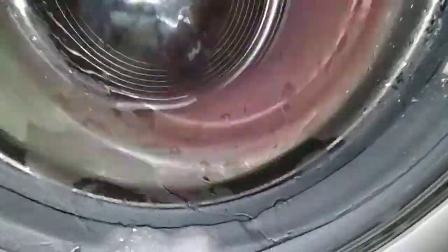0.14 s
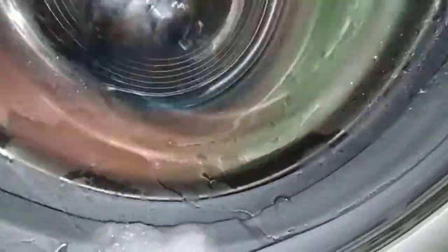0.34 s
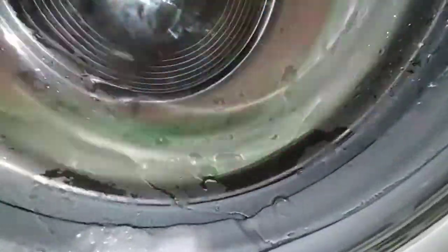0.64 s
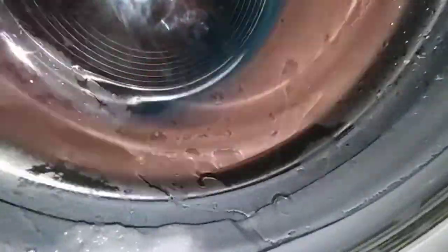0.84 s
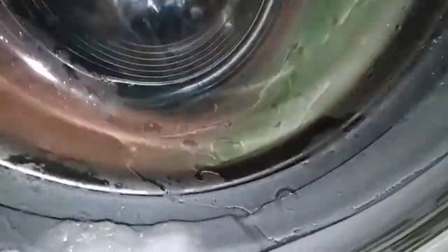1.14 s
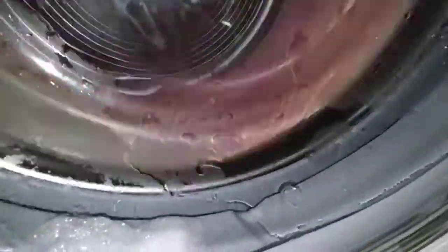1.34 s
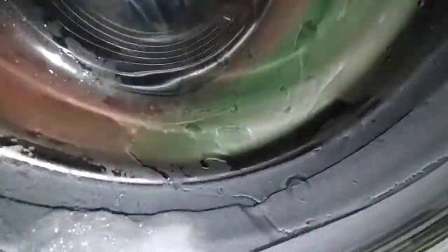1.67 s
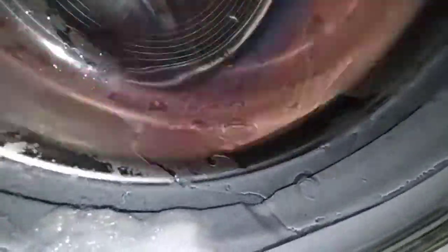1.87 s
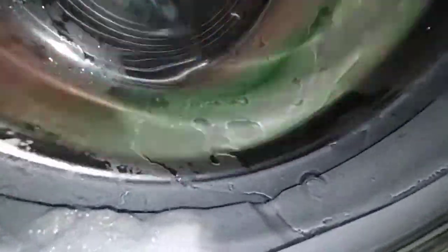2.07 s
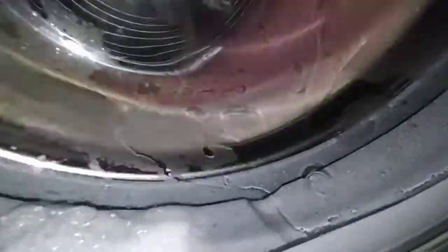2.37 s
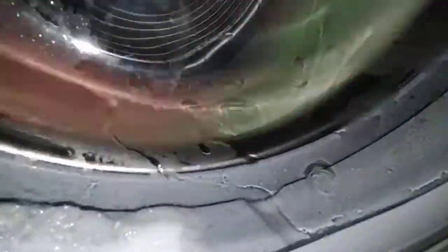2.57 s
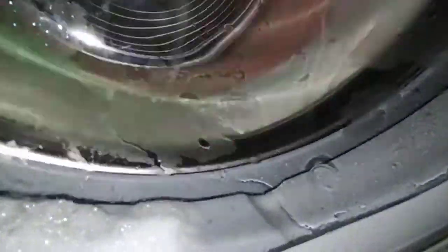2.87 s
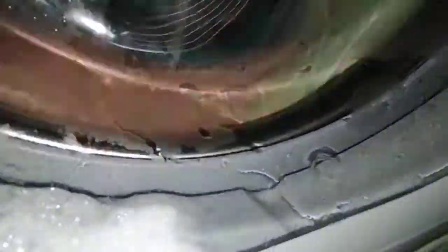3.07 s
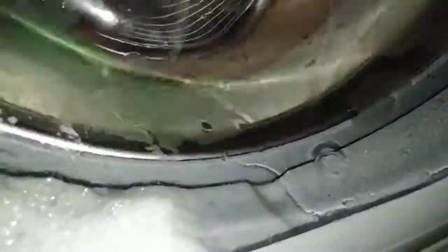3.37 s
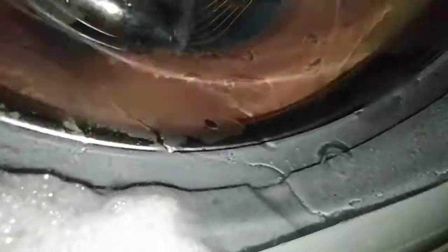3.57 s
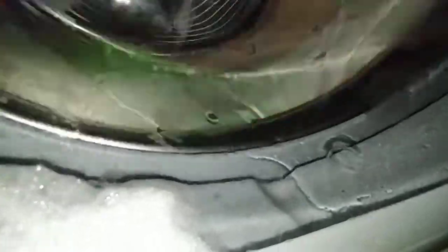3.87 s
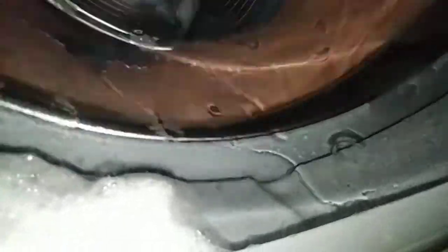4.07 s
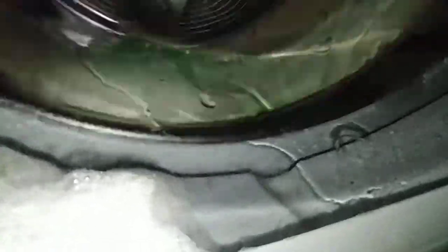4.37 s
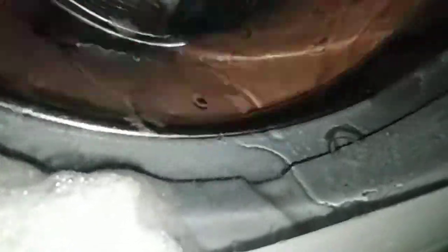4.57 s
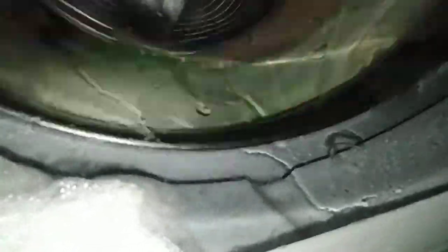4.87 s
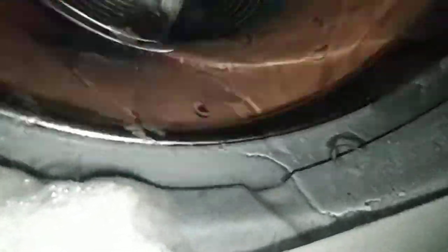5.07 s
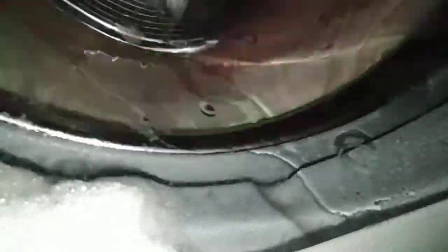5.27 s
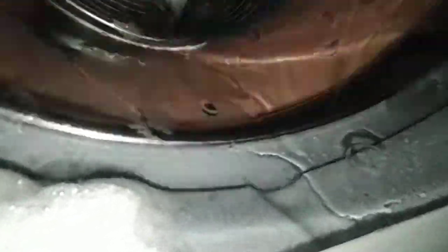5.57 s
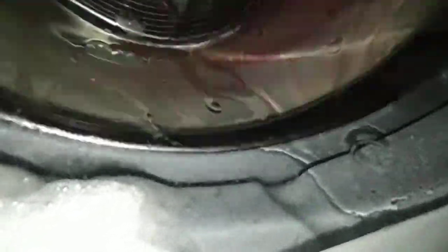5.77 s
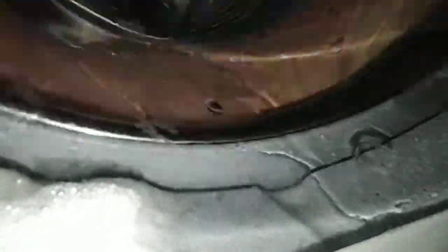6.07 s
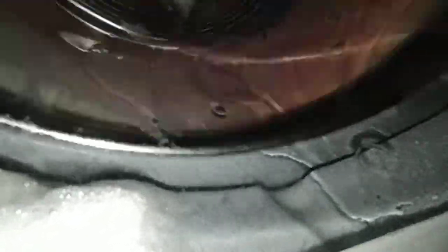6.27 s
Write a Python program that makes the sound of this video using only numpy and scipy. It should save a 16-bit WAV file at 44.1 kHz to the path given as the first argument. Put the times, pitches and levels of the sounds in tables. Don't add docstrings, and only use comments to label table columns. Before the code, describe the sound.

A washing machine gathers spin speed: a strong low motor hum slowly climbs in pitch over soft rumble, rushing air and hissing water.

```python
import sys
import numpy as np
from scipy import signal
from scipy.fft import rfft, irfft, next_fast_len
from scipy.io import wavfile

SR = 44100
rng = np.random.default_rng(int(sys.argv[2]) if len(sys.argv) > 2 else 0)


def generate_wav(sig):
    pcm = np.round(np.clip(np.atleast_2d(sig).T, -1, 1) * 32767).astype(np.int16)
    wavfile.write(sys.argv[1], SR, pcm)


def voltage_ratio(level):
    return 10 ** (np.asarray(level, float) / 20)


N = 283122
DROPOUT_S, LOST_SAMPLES = 3.56104, 1024
RUN = N + LOST_SAMPLES

# pitch_hz, level_db, left_over_right_db, left_lead_rad
CABINET = [(268.4, -29, 1.5, -0.089), (268.9, -27.5, 1.5, 0), (271.4, -20, 0, 0.092), (275, -20.5, 0, 0.17),
           (280.3, -24, -2.5, 0.22), (282.1, -28, -1.5, 0.38), (287.2, -22, 1, 0.11),
           (286.5, -23.5, 0, 0.3), (291, -28, -2.5, 0.33), (291, -27, 0, -0.38), (292.1, -30.5, 3, 0.17)]
# pitch_hz, angle_turns
HUM_ANGLE = [(267.7, .02), (270, .11), (276, .11), (280.5, .13), (282.3, .17), (284, .25), (285.8, .23),
             (289, .14), (293, .07), (295.5, .07)]
# hum_hz, lower_db, lower_turns, upper_db, upper_turns
WOBBLE = [(268, -47, .1, -41, .44), (270.3, -45, .15, -40, .57), (272, -42.5, .21, -40.5, .61),
          (275.4, -41, .3, -40, .71), (279, -35, .31, -39, .72), (281.5, -36, .25, -40.5, .74),
          (285.8, -39, .23, -46, .81), (289, -40.5, .22, -48, .88), (291.5, -40, .22, -47, .92),
          (294.5, -41, .13, -46, .8)]
# hum_hz, left_db, left_turns, right_db, right_turns
OCTAVE = [(268.8, -58, .85, -61, .92), (273, -57, .93, -55, .95), (277.3, -61, 1, -55, .94),
          (279.5, -72, 1.1, -63, 1.2), (281.6, -70, 1.26, -61, 1.38), (283.8, -64, 1.4, -51, 1.35),
          (286, -60, 1.33, -48.5, 1.28), (288.1, -54, 1.36, -51, 1.28), (290.2, -56, 1.21, -51, 1.23),
          (293, -58, 1.05, -52, 1.2)]

TUB_ORDERS = [(7, 0, .7), (11, .28, 1), (18, 0, .5), (24, .5, .7), (29, 0, 1), (28, .06, 1), (27, .68, 1),
              (34, .2, 0), (38, .9, .55), (39, .88, 0), (40, .5, 0), (8, 0, 0), (10, .99, .2),
              (13, .45, .4), (20, .8, .3), (23, .65, .9), (25, .15, .3)]
# pitch_hz, width_hz, level_db
TUB_MODES = [(54.54, 4.1, -37.5), (86.36, 2.7, -41.5), (147, 8.2, -47), (181.4, 6, -46),
             (221.6, 4.9, -49.5), (223, 4.7, -53), (220.6, 2.2, -45.5), (270, 35, -50), (300, 11, -45.5),
             (303, 8.1, -42.5), (307, 15, -51), (65, 6, -55), (81.2, 2.8, -55.5), (105.1, 5, -53),
             (166.2, 4.2, -49), (184.3, 7, -49), (192, 17, -51)]
WEAK_ORDERS = [3, 5, 9, 16, 21]
WEAK_ORDER_DB = [-57, -62.5, -54, -50.5, -56]

PUMP_MULTIPLES = [2, 3, 4, 6, 7, 8, 9, 10, 11]
PUMP_ANGLE = [.29, .29, .08, .29, .29, .03, .05, .94, .29]
PUMP_DB = [-63.5, -63.5, -52, -39, -63.5, -56.5, -53, -59.5, -62]

# start_s, length_s, level_db, pitch_hz
BOOMS = [(0.147, 0.083, -41, 137), (1.134, 0.039, -39.5, 149), (1.234, 0.15, -37, 131.3),
         (1.607, 0.037, -40.5, 148), (1.809, 0.033, -41, 132.6), (1.907, 0.034, -40, 140),
         (2.144, 0.164, -39, 132), (2.434, 0.051, -33, 136), (2.577, 0.13, -38, 138.6),
         (2.803, 0.14, -38, 138.5), (3.066, 0.058, -38, 132.6), (3.198, 0.17, -38, 139.4),
         (3.507, 0.138, -41, 131), (3.992, 0.028, -34.5, 140), (4.082, 0.035, -41, 130),
         (4.273, 0.12, -38.5, 136), (4.463, 0.23, -39.5, 142.8), (4.972, 0.048, -37, 136),
         (5.064, 0.051, -41, 134), (5.211, 0.064, -36.5, 137), (5.509, 0.04, -35, 138),
         (5.786, 0.066, -36, 133.8), (5.896, 0.068, -38, 146), (6.053, 0.109, -45, 147),
         (6.223, 0.035, -38.5, 143.4)]
# start_s, peak_db, centre_hz
SPURTS = [
    (0.6692, -38, 8370),
    (2.395, -38.5, 8820),
    (2.6537, -33, 8300),
    (4.0794, -43, 8030),
    (4.7794, -42, 3830),
]
# start_s, peak_db, left_over_right_db
TICKS = [(0.4624, -43.5, 13), (0.4877, -41, 11), (0.7534, -39, 2), (1.066, -50, 11), (1.424, -50, 12),
         (1.5394, -53, 9), (1.738, -43, -2), (1.947, -42, 6), (2.0554, -48, 5), (2.415, -44, 12),
         (2.995, -43, 10), (3.2929, -44, -7)]

# pitch_hz, density_db_per_hz
SPRAY = [(4500, -20), (5500, -6), (7000, -2.5), (8200, 1.5), (9200, 2), (10500, 1), (12500, -4),
         (14000, -5)]
BEFORE_SOAK_DB = (-16, -0.5)

CARRIER_HZ = (14781, 14767)
SIDEBANDS = [-7, -5, -1, 1, 5, 7]
# left_db, right_db
WHISTLE = [(-84.5, -89), (-99.5, -100.5), (-74.5, -78.5), (-88, -79), (-96.5, -91.5), (-94, -95)]
# pitch_hz, width_hz, level_db
CARRIER_HISS = [(14770, 380, -65), (14250, 600, -72.5), (15300, 600, -72)]

# pitch_hz, width_hz, level_db
PANELS = [(136, 29, -51.5), (182.8, 16, -53), (401.2, 11, -52), (449, 16, -55.5), (551.7, 24, -56.5),
          (835, 52, -56.5), (849.6, 27, -58)]
# pitch_hz, width_hz, level_db
WHIRR = [(1043, 38, -57), (1246, 156, -50.5)]
# pitch_hz, width_hz, level_db
HOLES = [(2434, 130, -62.5), (2772, 120, -61.5)]

# pitch_hz, density_db_per_hz
RUMBLE = [(24, -18), (45, -21.5), (75, -18.5), (140, -11), (190, -12.5), (230, -8), (480, -18.5),
          (600, -17)]
# pitch_hz, density_db_per_hz
ROAR = [(600, -9), (700, -7.5), (850, -2.5), (1050, -3.5), (1300, -9), (1700, -8.5)]
# pitch_hz, density_db_per_hz
AIR = [(1300, -8), (1700, -1.5), (2000, -0.5), (2450, 0), (3100, -5.5), (4000, -10), (5000, -17),
       (6500, -16)]
# before_mic_turn_db, after_mic_turn_db
RUMBLE_DB = (-40, -40)
ROAR_DB = (-47.5, -45.5)
AIR_DB = (-51.5, -52.5)
SPRAY_DB = (-59.5, -57)

# pitch_hz, width_hz, level_db
ROOM = [(31, 6, -8), (92, 5.4, -4), (118, 9, -3.5), (161.4, 7.6, 5), (172, 6, -6), (195, 9, 5.5),
        (204, 4.8, -10), (228, 13, -8), (335, 13, -4.5), (412, 18, -3.5), (471, 19, -4.5), (511, 19, 5.5),
        (529, 14, -4), (564.5, 9.7, -0.5), (650, 26, -3.5), (678, 15, 2.5), (780, 20, 3.5), (787, 16, -5.5),
        (890, 14, 2), (950, 20, 1.5), (970, 16, -1), (1020, 14, 3), (1064, 20, -3), (1080, 27, -0.5),
        (1190, 16, -0.5), (1310, 20, 1), (1390, 24, -4), (1390, 16, 5.5)]
# pitch_hz, likeness_share, right_lag_ms
LIKENESS = [(60, 0.98, 0), (292, 0.95, 0.23), (460, 0.69, 0), (697, 0.31, 0.067), (1110, 0.72, 0.23),
            (1380, 0.45, 0.35), (2220, 0.29, 0.064), (4000, .023, 0.33)]
# pitch_hz, before_mic_turn_db, after_mic_turn_db
LEANING = [(300, -1.5, -1), (597, 0, 0), (1200, 1, 0), (2600, 6, 1.5), (4240, 4.5, 4), (5470, 9.5, 0.5),
           (7000, 16.5, 5), (8500, -4, 1.5), (10200, -9, -2), (12400, -1.5, -1), (14700, 3, 6.5)]
# pitch_hz, width_hz, lost_before_turn_share, lost_after_turn_share
PORT_DIPS = [(703, 160, 0.42, 0.092), (1980, 450, 0.28, 0.046), (4800, 390, 0.27, 0.15),
             (5450, 750, .05, .35), (8300, 700, .3, .02), (10440, 1700, .02, 0.44)]
# pitch_hz, width_hz, lost_before_turn_share, lost_after_turn_share, port_0_left_1_right
ONE_PORT_DIPS = [(9900, 1100, .6, .15, 0), (11300, 800, .5, .3, 1), (6100, 600, .4, .2, 1)]
JOIN_STEP = [-.047, -.087]


def motor(drum, rate):
    hum_db, cabinet_mean_db = -25, -25
    hz = 36 * rate
    body_db, lean_db, lead = (at_hz(CABINET, hz, column=c) for c in (1, 2, 3))
    lower_db, lower, upper_db, upper = (at_hz(WOBBLE, hz, column=c) for c in (1, 2, 3, 4))
    angle = 36 * drum + at_hz(HUM_ANGLE, hz)
    level_db = hum_db + body_db - cabinet_mean_db
    hum = np.array([tone(angle + side * lead / (2 * np.pi), level_db + side * lean_db)
                    for side in (.5, -.5)])
    octave = np.array([tone(72 * drum + at_hz(OCTAVE, hz, column=c + 1), at_hz(OCTAVE, hz, column=c))
                       for c in (1, 3)])
    neighbours = tone(35 * drum + lower, lower_db) + tone(37 * drum + upper, upper_db)
    return hum + octave + neighbours


def drum_orders(drum, rate):
    lean_db, right_lead_samples = 1, 8
    orders = []
    for (k, angle, swing), (hz, width_hz, peak_db) in zip(TUB_ORDERS, TUB_MODES):
        off = 2 * (k * rate - hz) / width_hz
        slipped = angle - swing * np.arctan(off) / np.pi
        orders.append((k, slipped, peak_db - 10 * np.log10(1 + off ** 2)))
    orders += zip(WEAK_ORDERS, rng.random(len(WEAK_ORDER_DB)), WEAK_ORDER_DB)
    tub = sum(tone(k * drum + angle, db + 0.53 * drift(2.3)) for k, angle, db in orders)
    return np.array([voltage_ratio(lean_db / 2) * tub, voltage_ratio(-lean_db / 2) * np.roll(tub, -right_lead_samples)])


def pump():
    mains = turns(50.07)
    partials = zip(PUMP_MULTIPLES, PUMP_ANGLE, PUMP_DB)
    return sum(tone(k * mains + angle, db + 0.35 * drift(1.5)) for k, angle, db in partials)


def booms():
    out = np.zeros(RUN + SR)
    for (start_s, length_s, db, hz), angle in zip(BOOMS, rng.random(len(BOOMS))):
        s = np.arange(round(1.52 * length_s * SR)) / SR
        i = max(round((start_s - .3 * length_s) * SR), 0) + (start_s > DROPOUT_S) * LOST_SAMPLES
        note = np.sin(2 * np.pi * (hz * s + angle))
        out[i:i + len(s)] += voltage_ratio(db + 1.5) * np.hanning(len(s)) * note
    return out[:RUN]


def water():
    spurt_t60_s, spurt_rise_s, spurt_spread = 0.28, 0.0062, 0.23
    tick_hz, tick_t60_s = 2400, .012
    crack_hz, crack_db = 6500, -9
    out, s = np.zeros((2, RUN)), np.arange(SR // 5) / SR
    for start_s, db, hz in SPURTS:
        puff = rms_one(resonate(rng.standard_normal((2, len(s))), hz, hz * spurt_spread))
        swell = (1 - np.exp(-s / spurt_rise_s)) * voltage_ratio(-60 * s / spurt_t60_s)
        i = round(start_s * SR) + (start_s > DROPOUT_S) * LOST_SAMPLES
        out[:, i:i + len(s)] += voltage_ratio(db - 15.0) * puff * swell
    for start_s, db, lean_db in TICKS:
        burst = rng.standard_normal(len(s))
        body = rms_one(resonate(burst, tick_hz, tick_hz))
        crack = voltage_ratio(crack_db) * rms_one(resonate(burst, crack_hz, crack_hz))
        tick = (body + crack) * voltage_ratio(-60 * s / tick_t60_s)
        sides_db = np.array([[lean_db / 2], [-lean_db / 2]])
        i = round(start_s * SR)
        out[:, i:i + len(s)] += voltage_ratio(db - 2.0 + sides_db) * tick
    return out


def spray(turn):
    edge_hz, above_db, end_hz = 9700, -11, 13350
    soak_s, soak_rise_s = .465, .012
    hiss = banded_noise(SPRAY, turn, patchy_db=1.3, flicker=15.0)
    below = signal.sosfilt(signal.butter(10, edge_hz, fs=SR, output="sos"), hiss)
    above = signal.sosfilt(signal.butter(10, end_hz, fs=SR, output="sos"), np.roll(hiss, SR, axis=1))
    unsoaked = np.clip((soak_s - np.arange(RUN) / SR) / soak_rise_s, 0, 1)
    return voltage_ratio(np.outer(BEFORE_SOAK_DB, unsoaked)) * below + voltage_ratio(above_db) * above


def inverter(drum, turn):
    field = 12 * drum
    carrier = turns(np.linspace(*CARRIER_HZ, RUN) + 3.0 * drift(8))
    lines = 0
    for k, sides_db in zip(SIDEBANDS, WHISTLE):
        lines = lines + np.array([tone(carrier + k * field, db + 3.0 * drift(0.92)) for db in sides_db])
    steep = signal.ellip(8, .5, 40, 14060, "high", fs=SR, output="sos")
    smear = signal.sosfilt(steep, ringing_noise(CARRIER_HISS, turn))
    swell_db = np.interp(np.arange(RUN) / SR, [0, 3.2, 6.4], [-3, 1.5, 0])
    return (lines + smear) * voltage_ratio(swell_db)


def ringing_noise(modes, turn):
    white = rng.standard_normal((2, RUN))
    out = 0
    for hz, width_hz, db in modes:
        ring = spread(*resonate(white, hz, width_hz), hz, turn)
        out = out + voltage_ratio(db) * rms_one(ring)
    return out


def banded_noise(spectrum, turn, patchy_db, flicker):
    lowest, highest = spectrum[0][0], spectrum[-1][0]
    edges = lowest * 2 ** np.arange(0, np.log2(highest / lowest), 1 / 4)
    out, together, white = 0, drift(4.7), rng.standard_normal((2, 2, RUN))
    for k, (low, high) in enumerate(zip(edges, edges[1:])):
        band = signal.butter(2, [low, high], "band", fs=SR, output="sos")
        pair = signal.sosfilt(band, white[k % 2])
        hz = np.sqrt(low * high)
        level_db = at_hz(spectrum, hz) + patchy_db * (0.28 * together + drift(flicker))
        out = out + slow_gain(level_db) * spread(*pair, hz, turn)
    return rms_one(out)


def room(x):
    size = next_fast_len(RUN)
    hz = np.arange(size // 2 + 1) * SR / size
    response_db = sum(db / (1 + (2 * (hz - at) / width_hz) ** 2) for at, width_hz, db in ROOM)
    return irfft(rfft(x, size) * voltage_ratio(response_db), size)[:, :RUN]


def microphone_turn():
    from_s, to_s = 1.5, 4.7
    share = np.clip((np.arange(RUN) / SR - from_s) / (to_s - from_s), 0, 1)
    return share ** 2 * (3 - 2 * share)


def spread(near, other, hz, turn):
    alike = np.clip(at_hz(LIKENESS, hz), 0, 1)
    lag = round(at_hz(LIKENESS, hz, column=2) * SR / 1000)
    lean_db = at_hz(LEANING, hz) * (1 - turn) + at_hz(LEANING, hz, column=2) * turn
    lean = slow_gain(lean_db / 2)
    right = alike * np.roll(near, lag) + np.sqrt(1 - alike ** 2) * other
    return np.array([near * lean, right / lean])


def port_shadows(x, turn):
    out = x.copy()
    for hz, width_hz, before, after, *ports in PORT_DIPS + ONE_PORT_DIPS:
        for port in ports or range(2):
            flutter = 1.1 * np.maximum(drift(10), 0) * (hz > 3500)
            lost = np.clip((before + (after - before) * turn) * (1 + flutter), 0, 1)
            out[port] -= lost * resonate(x[port], hz, width_hz)
    return out


def dropout(whole):
    settle_s, top_hz = .0008, 15800
    cut = round(DROPOUT_S * SR)
    joined = np.delete(whole, slice(cut, cut + LOST_SAMPLES), axis=1)
    gap = JOIN_STEP - (joined[:, cut] - joined[:, cut - 1])
    away = np.arange(N) - cut + .5
    joined += np.outer(gap / 2, np.sign(away) * np.exp(-abs(away) / SR / settle_s))
    return signal.sosfilt(signal.butter(6, top_hz, fs=SR, output="sos"), joined)


def resonate(x, hz, width_hz):
    r = np.exp(-np.pi * width_hz / SR)
    b = (1 - r * r) / 2 * np.array([1, 0, -1])
    a = [1, -2 * r * np.cos(2 * np.pi * hz / SR), r * r]
    return signal.lfilter(b, a, signal.lfilter(b, a, x))


def tone(angle, db):
    return np.sqrt(2) * slow_gain(db) * np.cos(2 * np.pi * angle)


def turns(hz):
    angle = np.cumsum(hz + np.zeros(RUN)) / SR
    return angle - angle[round(DROPOUT_S * SR)]


def drift(rate):
    r = np.exp(-80 * np.pi * rate / SR)
    steps = rng.standard_normal(RUN // 40 + 2002)
    slow = signal.lfilter([1], [1, -2 * r, r * r], steps)[2000:]
    return np.repeat(rms_one(slow), 40)[:RUN]


def slow_gain(db):
    return np.repeat(voltage_ratio(db[::32]), 32)[:RUN]


def at_hz(points, hz, column=1):
    table = np.array(points)
    return np.interp(np.log(hz), np.log(table[:, 0]), table[:, column])


def rms_one(x):
    return x / np.sqrt(np.mean(x ** 2) + 1e-20)


def scene():
    s, turn = np.arange(RUN) / SR, microphone_turn()
    rate = (267.73 + 4.275 * s) / 36
    drum = turns(rate)
    rumble, roar, air, wet = (slow_gain(before + (after - before) * turn)
                              for before, after in (RUMBLE_DB, ROAR_DB, AIR_DB, SPRAY_DB))
    noise = rumble * banded_noise(RUMBLE, turn, patchy_db=1.5, flicker=11.0)
    noise += roar * banded_noise(ROAR, turn, patchy_db=0.9, flicker=28.0)
    noise += air * banded_noise(AIR, turn, patchy_db=1.32, flicker=17)
    noise += wet * spray(turn)
    noise = port_shadows(noise, turn)
    for modes, turn_db in ((PANELS, 4), (WHIRR, -2), (HOLES, -8.5)):
        noise += slow_gain(turn_db * turn) * ringing_noise(modes, turn)
    whole = motor(drum, rate) + drum_orders(drum, rate) + pump()
    whole = whole + room(noise + booms()) + water() + inverter(drum, turn)
    top_cut = signal.ellip(10, .5, 50, 15530, fs=SR, output="sos")
    return dropout(signal.sosfilt(top_cut, whole))


def band_limit(x):
    return signal.sosfilt(signal.butter(12, 16250, fs=SR, output="sos"), x)


def record(dry):
    return band_limit(dry)


dry = scene()
out = record(dry)
generate_wav(out)
```